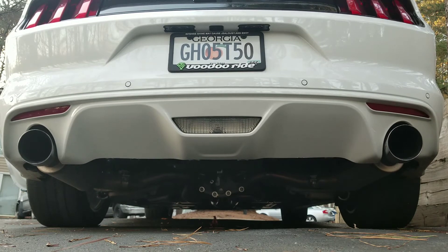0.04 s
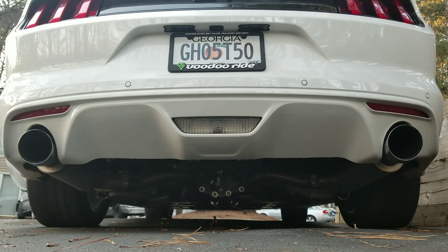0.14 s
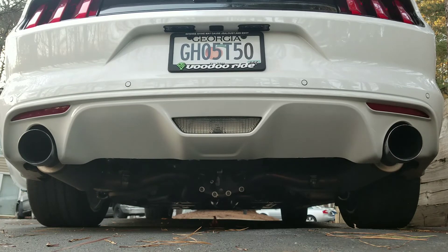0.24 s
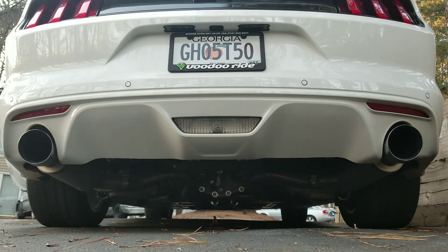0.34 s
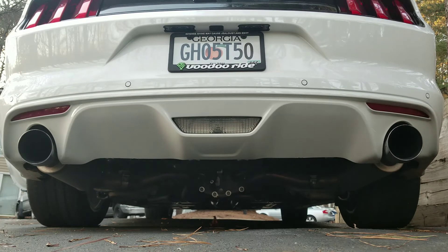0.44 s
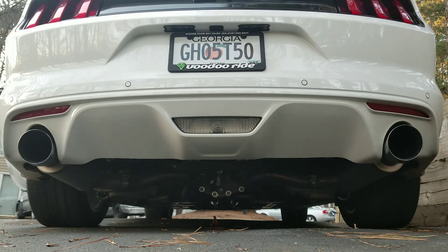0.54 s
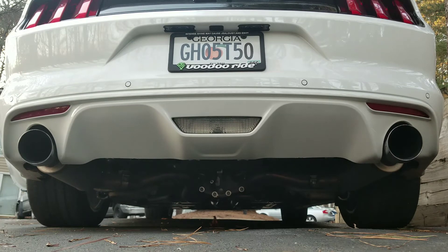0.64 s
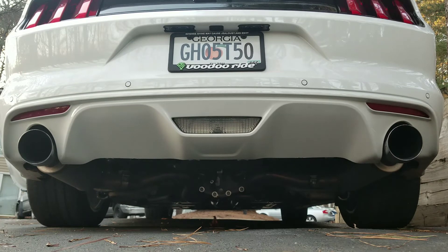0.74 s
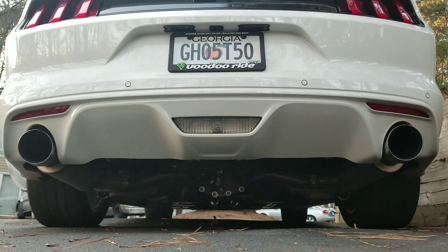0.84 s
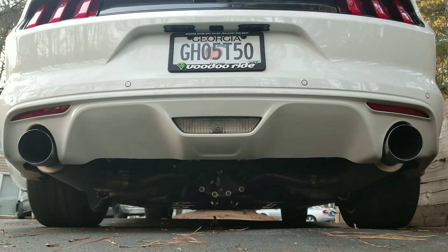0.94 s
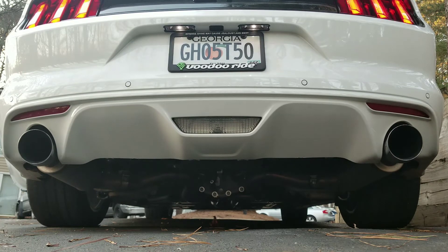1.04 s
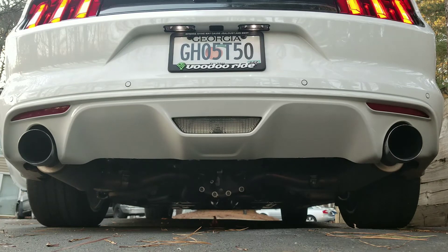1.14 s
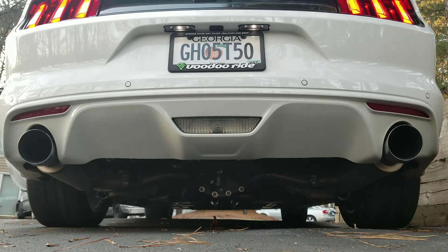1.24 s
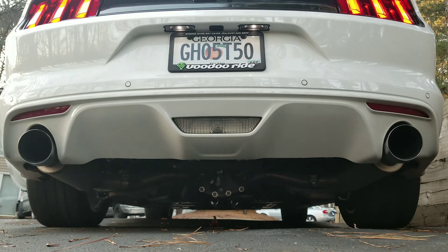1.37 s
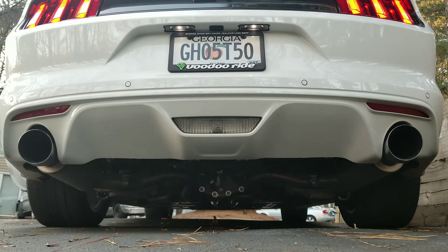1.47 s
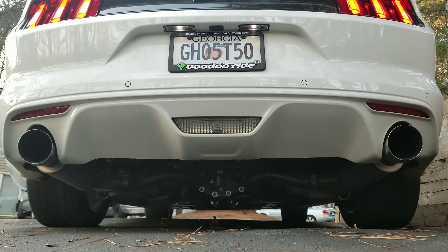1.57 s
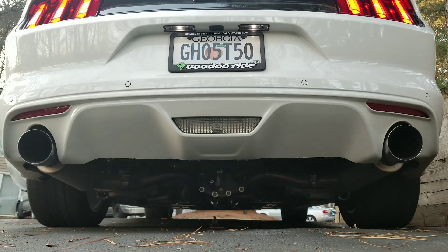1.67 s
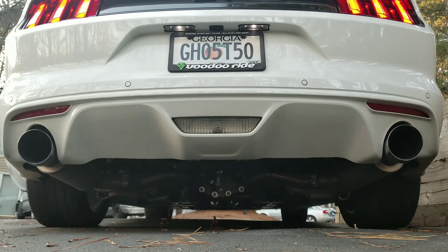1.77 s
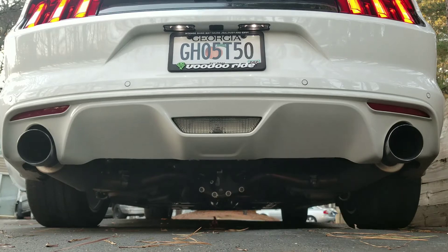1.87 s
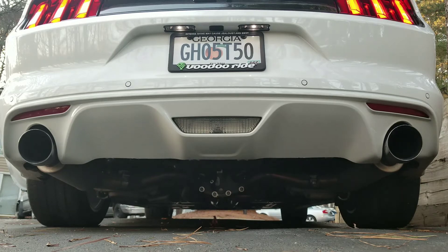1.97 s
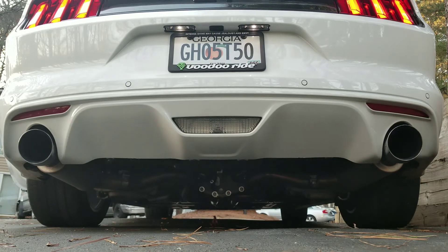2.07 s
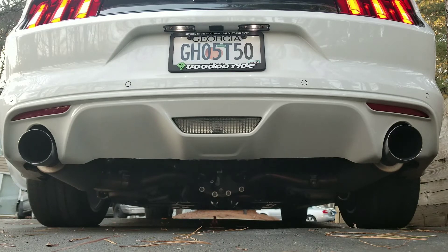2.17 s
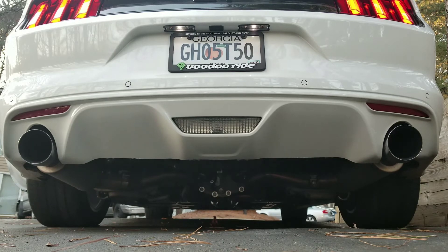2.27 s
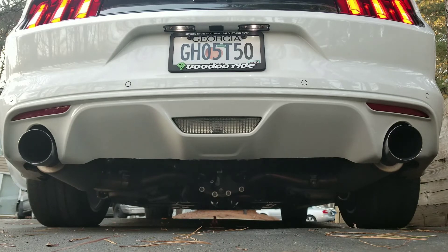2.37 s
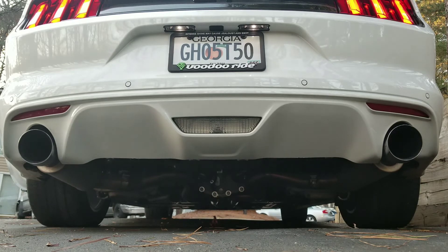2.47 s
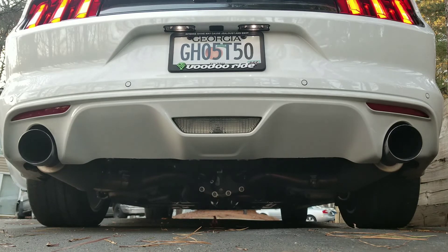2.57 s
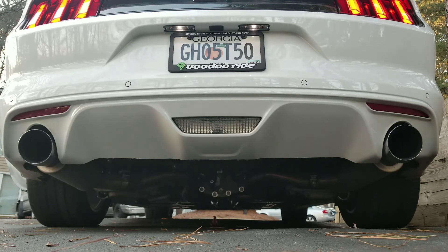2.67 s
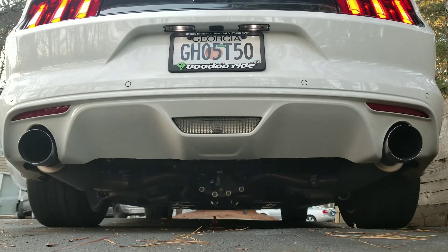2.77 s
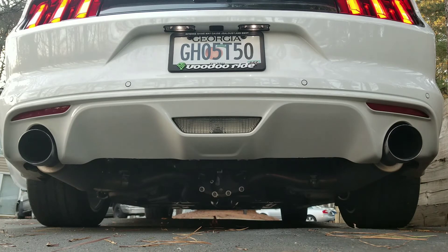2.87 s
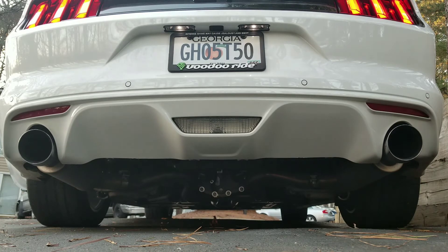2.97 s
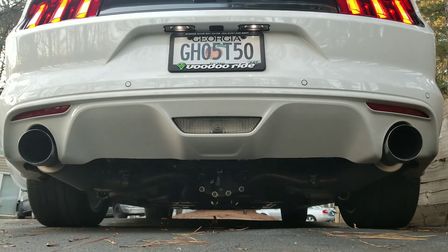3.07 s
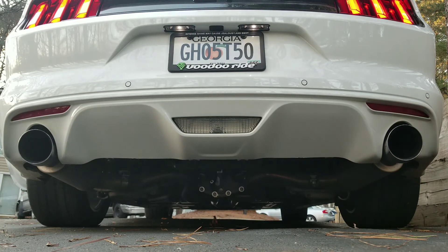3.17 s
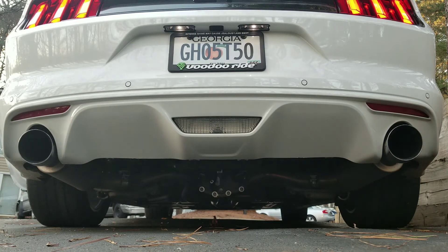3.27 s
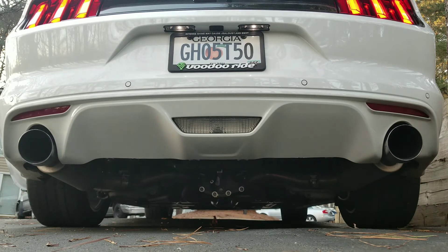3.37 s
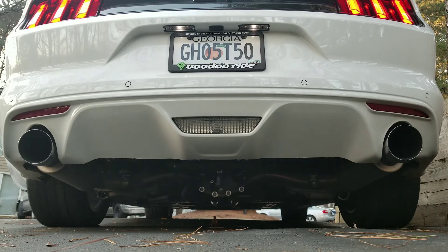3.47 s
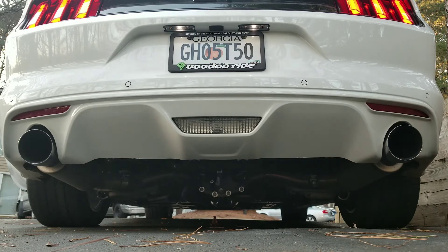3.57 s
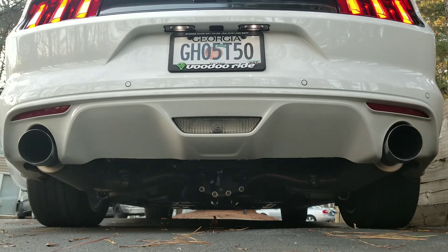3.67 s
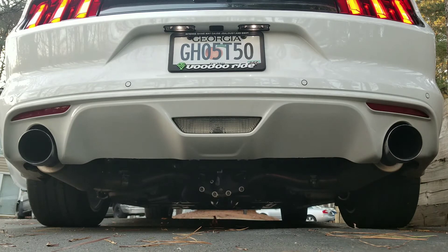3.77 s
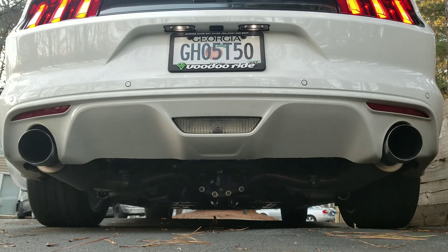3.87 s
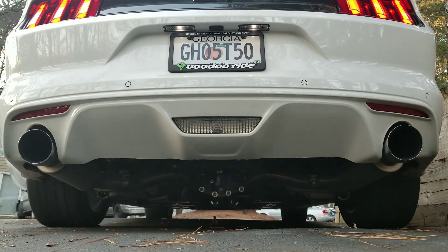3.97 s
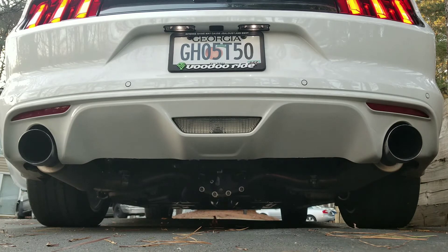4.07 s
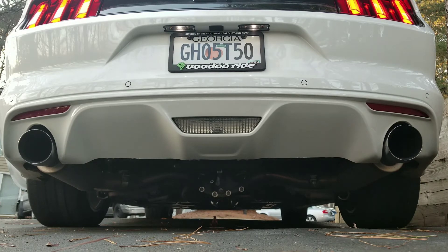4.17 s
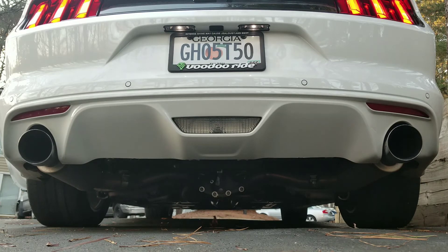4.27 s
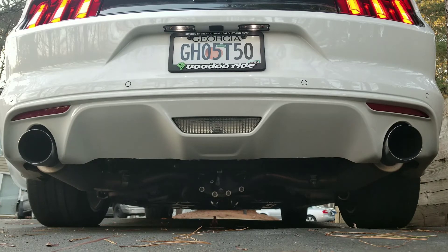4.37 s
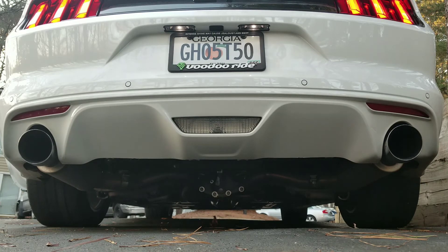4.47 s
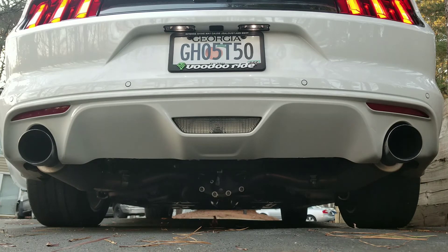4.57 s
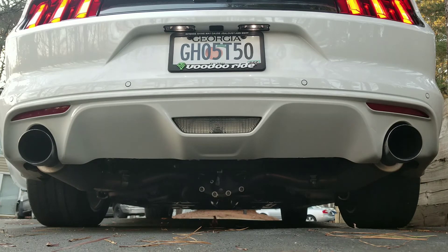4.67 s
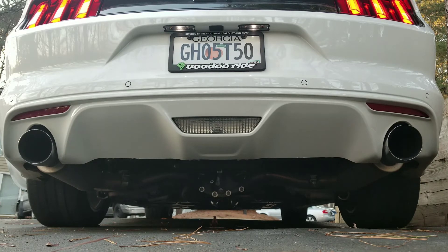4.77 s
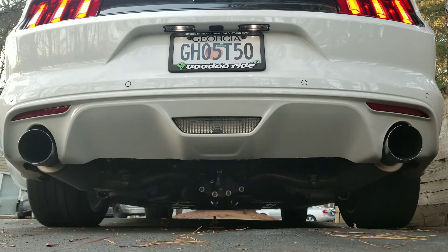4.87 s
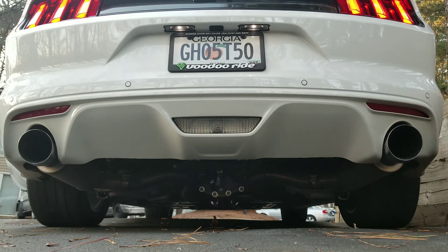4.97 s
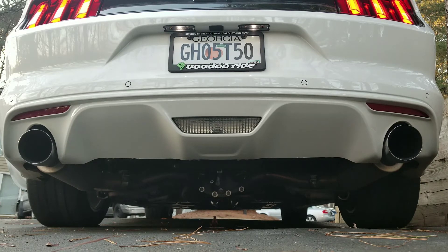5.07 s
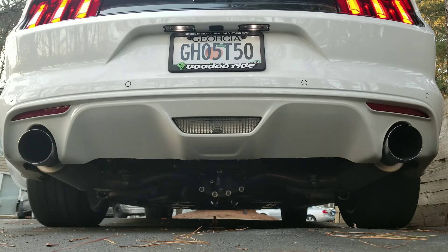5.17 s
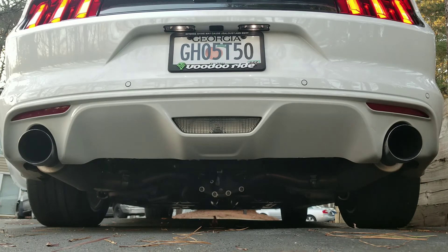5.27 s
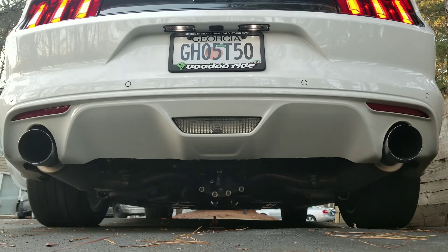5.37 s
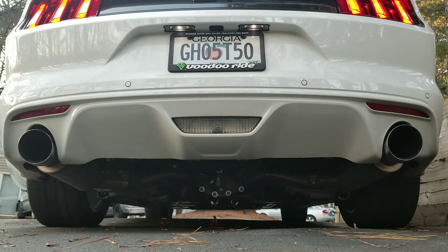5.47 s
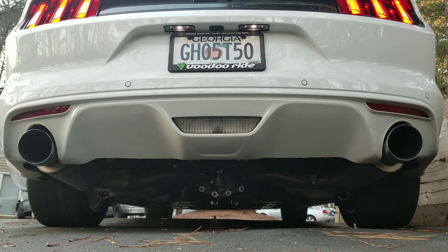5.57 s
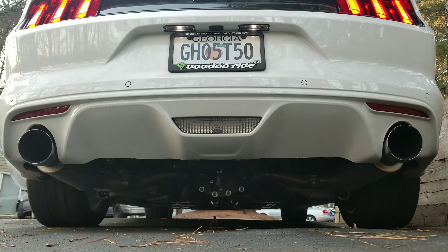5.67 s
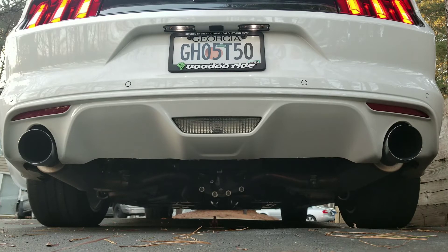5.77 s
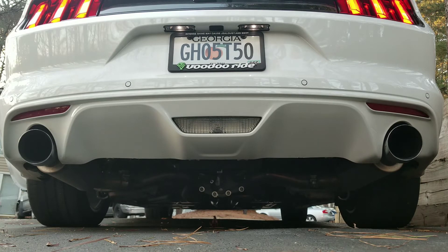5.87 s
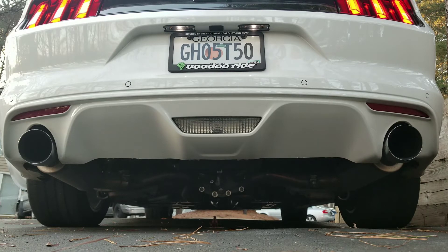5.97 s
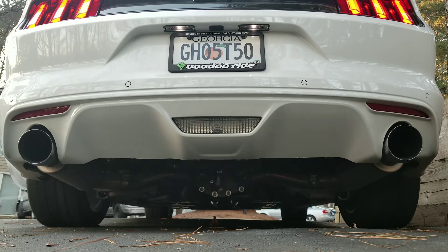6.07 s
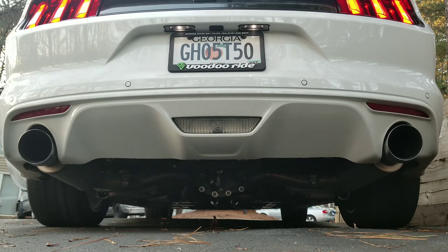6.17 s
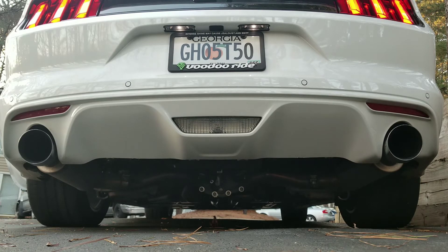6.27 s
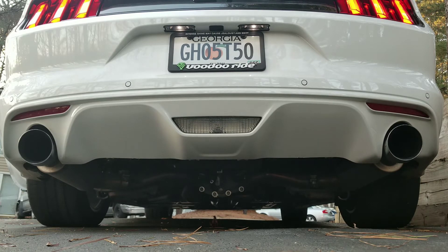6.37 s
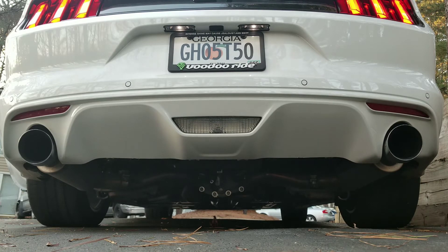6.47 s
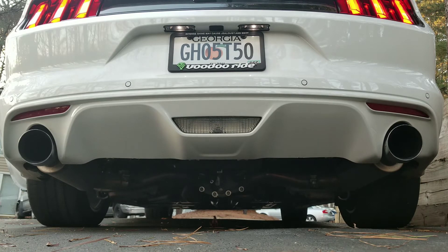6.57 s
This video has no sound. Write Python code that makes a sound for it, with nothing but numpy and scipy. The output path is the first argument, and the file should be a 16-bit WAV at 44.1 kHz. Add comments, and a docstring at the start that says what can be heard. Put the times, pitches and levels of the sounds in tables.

```python
"""A faint metallic ring dies away over distant traffic; then a V8 car starts cold, heard from the ground
just behind its two tailpipes. The starter clashes into the ring gear and grinds against each compression;
low thumps puff through the pipes, then the cylinders catch, flare and settle to a fast idle.
Pulses timed by the crank drive pipe and silencer resonances; shaped noise gives gas, gears and traffic."""
import sys
import numpy as np
from scipy import signal
from scipy.fft import rfft, irfft
from scipy.io import wavfile
from scipy.ndimage import uniform_filter1d, minimum_filter1d

SR = 44100
rng = np.random.default_rng(int(sys.argv[2]) if len(sys.argv) > 2 else 0)


def wrap_up_sound(samples):
    """Save the sound to the file named by the first command line argument, as 16-bit audio."""
    columns = np.atleast_2d(samples).T
    # keep every value between -1 and 1, then stretch to whole-number steps
    tamed = np.clip(columns, -1, 1)
    steps = np.round(tamed * 32767).astype(np.int16)
    wavfile.write(sys.argv[1], SR, steps)


N = 291942

# Levels in the tables are relative.
# road noise spectrum: (frequency [Hz], level [dB])
TRAFFIC_SPECTRUM = [(15, -37.5), (25, -11.5), (49, -6), (137, 0), (240, -10), (388, -11), (520, -13),
                    (959, -14), (1290, -21.5), (1510, -29.5), (1870, -33), (2500, -49), (5410, -54.5),
                    (13000, -52), (14500, -58)]
TRAFFIC_DB = -44.5

# low thumps in the pipes: puffs while cranking, then the first bang of the catch: (time [s], level [dB])
THUMPS = [(1.179, -40.5), (1.32, -49), (1.401, -19.5), (1.52, -35), (1.616, -37), (1.711, -36),
          (1.799, -42.5), (1.889, -37), (1.976, -19), (2.014, -8.5)]

# gear rattle spectrum: (frequency [Hz], level [dB])
GEAR_SPECTRUM = [(150, -50), (250, -10), (431, -9.5), (502, -4.5), (556, -5), (647, -8), (1010, -5.5),
                 (1340, -2.5), (1570, -16.5), (2440, -8.5), (5510, -25), (7600, -21), (14500, -46)]
# starter housing modes: (frequency [Hz], width [Hz], level [dB])
HOUSING_MODES = [(530, 130, -13), (864, 390, -1.5), (2103, 18, 1.5), (2340, 210, -16.5), (2900, 24, -8),
                 (3250, 160, -15), (4145, 45, -5.5), (5690, 41, -20), (7480, 89, -13.5)]
# other tones that sing briefly in the starter: (time [s], pitch [Hz], level [dB], length [s])
WHINES = [(1.324, 562, -36, 0.058), (1.338, 822, -35.5, 0.029), (1.442, 1227, -37, 0.031),
          (1.87, 427, -41.5, 0.18), (1.967, 990, -33.5, 0.02), (2.295, 2730, -61.5, 0.15),
          (2.33, 1475, -49, 0.13)]
# compression strokes loading the starter: (time [s], grind level [dB], gear ring level [dB])
STROKES = [(1.53, -36, -52), (1.639, -37, -39), (1.739, -37, -28.5), (1.826, -37, -27), (1.916, -35.5, -27)]
# gear tones struck at the start of each stroke: (pitch [Hz], level [dB])
GEAR_RINGS = [(900, -1.5), (2950, -10.5)]
GEAR_RING_LAG_S, GEAR_RING_S = 0.0093, 0.012
MESH_HZ, MESH_DB = 1014, 2  # whine of the tooth mesh, mean level over the load
# the pinion touches, clashes in, then grinds evenly until the regular compression strokes begin
TOUCH_S, TOUCH_DB = 1.158, -29
CLASH_S, CLASH_DB, CLASH_RISE_S, CLASH_FALL_DB_S = 1.168, -26.5, 0.012, 333
EVEN_END_S, EVEN_DB = 1.49, -40.5
BETWEEN_DB = -47.5  # grind between the strokes
STROKE_RISE_S, STROKE_HOLD_S = 0.014, 0.042
STROKE_SAG_DB_S, STROKE_FALL_DB_S, LAST_FALL_DB_S = 66, 249, 132
RUN_DOWN_S, RUN_DOWN_DB, RUN_DOWN_FALL_DB_S = 2.05, -54.5, 30  # the freed motor coasts to rest

# cylinders in firing order: (gas charge [dB], snap [dB], travel time to the tailpipe [ms],
# left pipe share [0-1], hiss [dB])
CYLINDERS = [(2.2, -4.5, 2.4, 0, -6), (5, -1, 2.8, 0, -0.5), (4.5, -3, 6.09, 0, -3.5),
             (4.5, -12.5, 1.43, 0.8, -3), (-10, 1, 4.27, 0.4, -2), (5.5, -8.5, 5.15, 1, 1.5),
             (4.5, -2.5, 2.04, 1, -4), (-0.5, -6.5, 0.17, 0.3, -2.5)]
# engine speed as it catches, flares, sags and hunts about its idle: (time [s], firing rate [Hz])
SPEED = [(1.99, 51), (2.09, 66), (2.145, 88), (2.195, 101), (2.26, 106.5), (2.55, 107), (2.65, 104.4),
         (2.75, 99.5), (2.85, 96.7), (3.05, 88.8), (3.3, 87.2), (3.45, 85.2), (3.55, 82.8), (3.7, 84.7),
         (4.1, 86.1), (4.45, 85.2), (4.7, 85.9), (5.1, 84.9), (5.75, 85.2), (5.95, 84.7), (6.15, 86.3),
         (6.55, 84.6)]
# level of the engine as heard, including the recorder's gain recovering: (time [s], level [dB])
ENGINE_LEVEL = [(2.004, -35), (2.013, -6.5), (2.2, -11.5), (2.3, -10.5), (2.5, -14.5), (3.1, -13.5),
                (3.6, -13.5), (4.6, -9.5), (6.6, -10)]
# long pipe modes: (frequency [Hz], width [Hz], level [dB])
BOOM_MODES = [(47.6, 7.9, -19.5), (88.37, 6.78, -5), (120.2, 12.4, -1.5), (145.7, 39, -11.5),
              (252.9, 16.9, -20), (193.5, 18, -22.5)]
# mid-pipe modes that the flare drives: (frequency [Hz], width [Hz], level [dB])
BELLOW_MODES = [(168.6, 70, 1), (213, 42, 0)]
# silencer modes: (frequency [Hz], width [Hz], level [dB])
SNAP_MODES = [(118, 76, -8), (347.3, 98, -4), (509.4, 40, -5.5), (563.4, 29, -14.5), (601.4, 7.7, -10.5),
              (672.5, 50.7, -8), (741, 93, -8), (827, 124, -15.5)]
# gas jet spectrum: (frequency [Hz], level [dB])
GAS_SPECTRUM = [(880, -31), (1500, 2.5), (1570, -12.5), (1980, -4), (2190, -8), (3270, -8.5), (8050, -21.5),
                (9190, -31), (12800, -20.5), (14500, -23.5)]
# turbulent roar spectrum: (frequency [Hz], level [dB])
RASP_SPECTRUM = [(76, -29.5), (130, -4), (210, -7.5), (241, -15.5), (354, -9), (506, -11), (562, -12.5),
                 (709, -7), (1300, -49), (1690, -78.5), (2860, -120)]
CYCLE_START_S = 4.6025  # a firing of the first cylinder in the table
IDLE_S = 4.6, 6.5  # span over which engine levels are set
CATCH_BOOM_DB, CATCH_S = 4.5, 0.26  # the first charges are rich and even, and boom harder
BELLOW_DB = -5.5  # before the flare scales it
# snap and hiss follow the engine level; the rich flare after the catch adds to both, then dies away
SNAP_DB, FLARE_SNAP_DB, FLARE_PEAK_S = -8.5, 10, 0.33
HISS_DB, FLARE_HISS_DB, FLARE_HISS_S = -44, 10, 0.36
SNAP_BUILD_S = 0.02  # the silencers fill over the first firings

TOP_HZ = 14500


def undb(db):
    """Decibels to amplitude ratio."""
    return 10 ** (np.asarray(db) / 20)


def level(x, db, t0_s, t1_s):
    """Scale so that the span t0_s-t1_s has this rms level."""
    span = x[..., int(t0_s * SR):int(t1_s * SR)]
    return x * undb(db) / np.sqrt(np.mean(span ** 2))


def ring(x, modes):
    """Sum of resonances, neighbours in opposite phase."""
    total = 0
    for k, (hz, width_hz, db) in enumerate(modes):
        b, a = signal.iirpeak(hz, hz / width_hz, SR)
        total = total + (-1) ** k * undb(db) * signal.lfilter(b, a, x)
    return total


def ring_twice(x, modes):
    """Sum of resonances, each passed twice so that it swells before it decays."""
    return sum(ring(ring(x, [mode]), [mode]) for mode in modes)


def colour(x, points):
    """Shape a noise by (Hz, dB) points, joined on a log frequency axis."""
    hz, db = np.transpose(points)
    f_hz = np.maximum(np.arange(N // 2 + 1) * SR / N, 1)
    return irfft(rfft(x) * undb(np.interp(np.log(f_hz), np.log(hz), db)), N)


def clicks(at_s, size):
    """Pulses at times at_s, each shared between two samples."""
    at = np.clip(np.asarray(at_s) * SR, 0, N - 2)
    i = at.astype(int)
    return np.bincount(i, size * (1 + i - at), N) + np.bincount(i + 1, size * (at - i), N)


def wide(like):
    """Two-channel noise with likeness 0-1."""
    mid, side = rng.standard_normal((2, N))
    return np.sqrt(like) * mid + np.sqrt(1 - like) * side * np.array([[1], [-1]])


def walk(rate_hz):
    """Random levels, one per 1 / rate_hz, slewed from each to the next."""
    k = int(SR / rate_hz)
    steps = np.repeat(rng.standard_normal(N // k + 1), k)
    return uniform_filter1d(steps, k)[:N]


def fade(x, seconds):
    """Let every pulse die away with this time constant."""
    return signal.lfilter([1], [1, -np.exp(-1 / (seconds * SR))], x)


def muffle(x, hz):
    """Steep low-pass."""
    return signal.sosfilt(signal.butter(4, hz, fs=SR, output="sos"), x)


def blow(t, at_s, db, rise_s, fall_db_s):
    """Gain that climbs 30 dB in rise_s up to the moment at_s, then falls evenly in dB."""
    return undb(db + np.minimum(30 * (t - at_s) / rise_s, -fall_db_s * (t - at_s)))


def underbody(x, t60_s, db):
    """Dense short echoes between ground, car floor and walls."""
    t = np.arange(int(t60_s * SR)) / SR
    tail = rng.standard_normal(len(t)) * np.exp(-np.log(1000) * t / t60_s) * (t > 0.002)
    tail /= np.sqrt(np.sum(tail ** 2))
    return x + undb(db) * signal.fftconvolve(x, [tail])[:, :N]


def traffic():
    """Distant road noise that swells slowly; the bass is the same left and right."""
    bass = muffle(rng.standard_normal(N), 300)
    rest = signal.sosfilt(signal.butter(2, 300, "high", fs=SR, output="sos"), wide(0.54))
    swelling = bass * undb(3.7 * walk(5.4)) + rest * undb(2.0 + 0.8 * walk(4.4))
    return level(colour(swelling, TRAFFIC_SPECTRUM), TRAFFIC_DB, 0, 1)


def chirp():
    """A faint metallic ring, noise through resonances, dies away as the scene opens."""
    t = np.arange(N) / SR
    tone = ring(wide(0.6), [(3340, 120, 4.5), (4230, 970, -10), (8050, 900, -15), (12000, 2200, -23)])
    return level(tone, -53.5, 0, 1) * np.exp(-(t / 0.042) ** 2)


def thumps():
    """Each thump swells in the lowest pipe modes and dies away; the cranking block shudders."""
    at_s, db = np.transpose(THUMPS)
    t = np.arange(N) / SR
    low_modes = [(41.5, 5.9, -5.0), (89.0, 10.1, -0.5), (126, 36, -11.5)]
    swell = ring_twice(clicks(at_s, undb(db)), low_modes)
    shudder = level(muffle(rng.standard_normal(N), 138), -41, 0, 6) * (t > 1.17) * (t < 2.02)
    return swell * undb(72.5) + shudder


def cranking_load(t):
    """Gain from the even grind, the compression strokes and the run-down, whichever is loudest."""
    even_db = np.clip(EVEN_DB - STROKE_FALL_DB_S * (t - EVEN_END_S), BETWEEN_DB, EVEN_DB)
    turning = (t > CLASH_S) * (t < STROKES[-1][0]) * undb(even_db)
    for k, (at_s, db, _) in enumerate(STROKES):
        fall_db_s = STROKE_FALL_DB_S if k < len(STROKES) - 1 else LAST_FALL_DB_S
        release = undb(-fall_db_s * np.maximum(t - at_s - STROKE_HOLD_S, 0))
        stroke = blow(t, at_s, db, STROKE_RISE_S, STROKE_SAG_DB_S) * release
        turning = np.maximum(turning, stroke)
    return np.maximum(turning, blow(t, RUN_DOWN_S, RUN_DOWN_DB, 0.05, RUN_DOWN_FALL_DB_S))


def starter_tones(t, turning):
    """The tooth mesh whines with the load; short wavering tones sing and ring beside it."""
    waver, wobble_rad = undb(4.7 * walk(64.76)), 0.56 * walk(50)
    mesh_gain = undb(MESH_DB + 2.15 * walk(25)) * turning
    tones = mesh_gain * np.sin(2 * np.pi * MESH_HZ * t + 2.0 * walk(40))
    rings = [(at_s + GEAR_RING_LAG_S, hz, db + more_db, GEAR_RING_S)
             for at_s, _, db in STROKES for hz, more_db in GEAR_RINGS]
    for at_s, hz, db, length_s in WHINES + rings:
        swell = undb(db) * np.exp(-((t - at_s) / length_s) ** 4)
        tones = tones + swell * waver * np.sin(2 * np.pi * hz * t + wobble_rad)
    return tones * undb([[1.5], [-2.5]])


def starter():
    """Gear teeth rattle unevenly in the housing; the load of each compression stroke sets the level."""
    t = np.arange(N) / SR
    turning = cranking_load(t)
    touch = blow(t, TOUCH_S, TOUCH_DB, 0.012, CLASH_FALL_DB_S)
    clash = blow(t, CLASH_S, CLASH_DB, CLASH_RISE_S, CLASH_FALL_DB_S)
    load = np.maximum(np.maximum(clash, turning), touch)
    uneven = undb(1.4 * walk(500))
    teeth = level(colour(wide(0.63) * uneven, GEAR_SPECTRUM), 6.05, 1.5, 3.4) * undb([[-1.1], [1.1]])
    housing = level(ring(wide(0.66) * uneven, HOUSING_MODES), 1.7, 1.2, 2)
    return (teeth + housing) * load + starter_tones(t, turning)


def pipe_boom(charges, flare):
    """Gas charges ring the long pipes; the flare drives mid-pipe modes; noise rumbles below."""
    boom = level(muffle(ring(charges, BOOM_MODES), 400), 1.2, *IDLE_S)
    bellow = flare * level(ring_twice(charges, BELLOW_MODES), BELLOW_DB, *IDLE_S)
    # loose gas and panels shake below the firing note
    rumble = level(muffle(rng.standard_normal(N), 67), -34.5, *IDLE_S)
    return boom - bellow + rumble


def silencer_snap(t, arrive_s, crack, share):
    """Pressure fronts ring the silencers of the two pipes and echo under the car."""
    left, right = (muffle(ring(clicks(arrive_s, crack * w), SNAP_MODES), 850) for w in (share, 1 - share))
    # each channel hears the far pipe softer; the left is louder and hears 0.18 ms later
    late = np.interp(t - 0.00018, t, left + 0.64 * right)
    snap = underbody(np.array([undb(3.0) * late, right + 0.93 * left]), 0.11, -5.5)
    return level(snap, 0, *IDLE_S)


def lip_flutter(arrive_s, crack):
    """Each snap also flutters the tailpipe lips: noise bursts through resonances."""
    bursts = wide(0.5) * (0.074 + fade(clicks(arrive_s + 0.0011, crack), 0.0036))
    lips = ring(bursts, [(1090, 170, 1.5), (1286, 280, -1.5), (1430, 69, -4)])
    return level(muffle(lips, 1550), -33, *IDLE_S) * undb([[1.5], [-1.5]])


def gas_hiss(jet):
    """A jet of gas hisses out after each firing over a steady flow."""
    gas = colour(wide(0.5) * (0.8 + jet), GAS_SPECTRUM) * undb([[-1.2], [1.2]])
    return level(gas, 0, *IDLE_S)


def silencer_rasp(jet, firing_hz):
    """Turbulence in the silencers grows with engine speed."""
    rasp = level(colour(wide(0.94) * (0.6 + jet), RASP_SPECTRUM), -14, *IDLE_S)
    return rasp * undb(0.2 * (firing_hz - 85))


def engine():
    """Each firing booms in the long pipes, snaps in the silencers and lets a jet of gas hiss out."""
    t = np.arange(N) / SR
    start_s = SPEED[0][0]
    firing_hz = np.interp(t, *np.transpose(SPEED))
    engine_db = np.interp(t, *np.transpose(ENGINE_LEVEL))

    since_s = np.maximum(t - start_s, 0)
    catch = np.exp(-(since_s / CATCH_S) ** 4)
    flare = since_s / FLARE_PEAK_S * np.exp(1 - since_s / FLARE_PEAK_S)
    boom_db = engine_db + CATCH_BOOM_DB * catch
    snap_db = engine_db + SNAP_DB + FLARE_SNAP_DB * flare - 12 * np.exp(-since_s / SNAP_BUILD_S)
    hiss_gain_db = engine_db + HISS_DB + FLARE_HISS_DB * np.exp(-(since_s / FLARE_HISS_S) ** 2)

    # a cylinder fires at each whole count of the integrated firing rate
    firings = np.cumsum(firing_hz) / SR
    firings -= np.interp(CYCLE_START_S, t, firings)
    count = np.arange(np.ceil(np.interp(start_s, t, firings)), firings[-1])
    fired_s = np.interp(count, firings, t)
    cylinder = count.astype(int) % len(CYLINDERS)
    charge_db, crack_db, travel_ms, share, hiss_db = np.array(CYLINDERS)[cylinder].T
    chance = rng.standard_normal((len(count), 3)).T

    even_charge_db = charge_db * (1 - np.interp(fired_s, t, catch))
    charges = clicks(fired_s + 0.00979, undb(even_charge_db + 0.5 * chance[0]))
    arrive_s = fired_s + travel_ms / 1000 + 0.00008 * chance[1]
    crack = undb(crack_db + 1.5 * chance[2])
    jet = fade(clicks(fired_s + 0.009, undb(hiss_db + 1.8 * chance[0])), 0.002)

    snap = silencer_snap(t, arrive_s, crack, share)
    lips = lip_flutter(arrive_s, crack)
    hiss = gas_hiss(jet)
    rasp = silencer_rasp(jet, firing_hz)
    boom = pipe_boom(charges, flare)
    exhaust = undb(boom_db) * boom + undb(snap_db) * (snap + rasp + lips) + undb(hiss_gain_db) * hiss
    return (t > start_s) * exhaust


def scene():
    """Sum of all sources."""
    return engine() + starter() + thumps() + traffic() + chirp()


def record(dry):
    """A limiter holds the loudest peaks down and the top is cut."""
    peak = -minimum_filter1d(-np.abs(dry).max(axis=0), size=1200)
    gain = np.minimum(1, 0.96 / peak)
    gain = uniform_filter1d(uniform_filter1d(gain, size=590), size=590)
    top_cut = signal.ellip(12, 0.2, 70, TOP_HZ, fs=SR, output="sos")
    return signal.sosfilt(top_cut, dry * gain)


dry = scene()
out = record(dry)
wrap_up_sound(out)
```